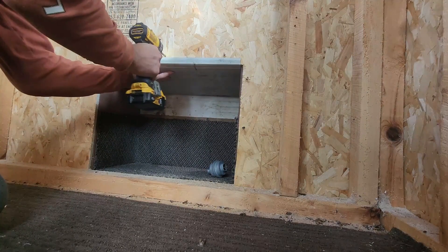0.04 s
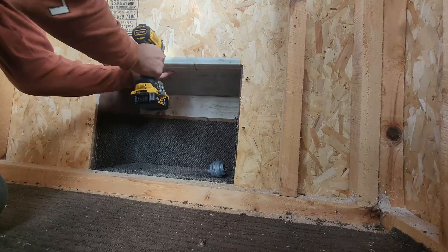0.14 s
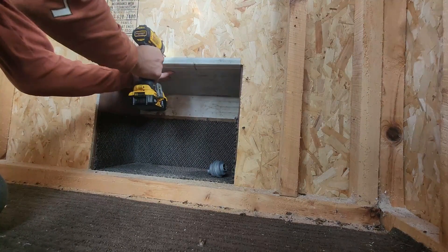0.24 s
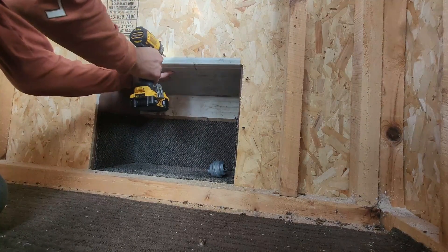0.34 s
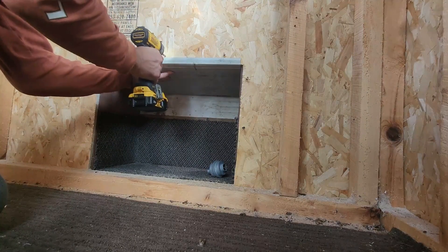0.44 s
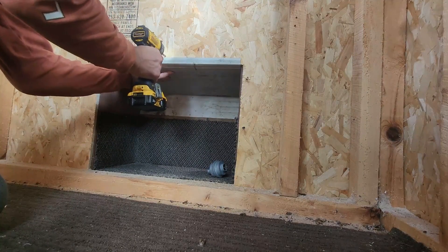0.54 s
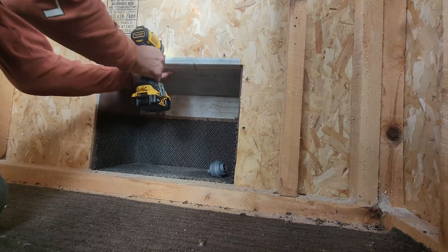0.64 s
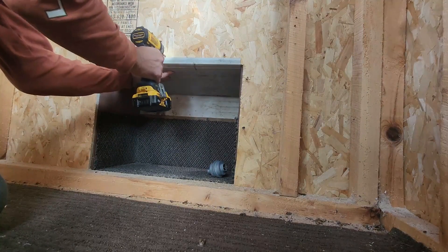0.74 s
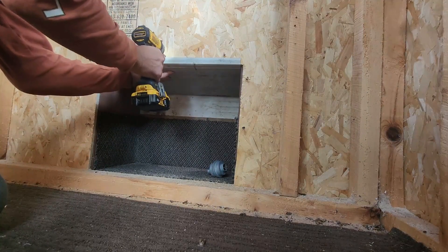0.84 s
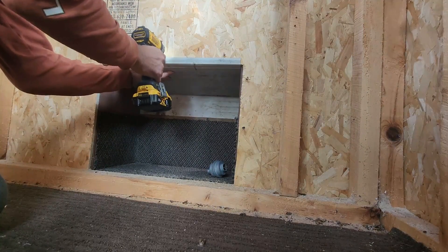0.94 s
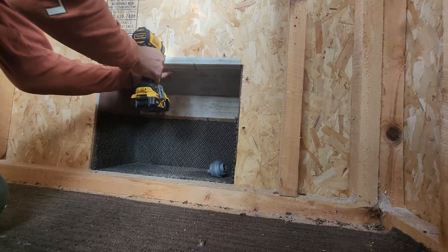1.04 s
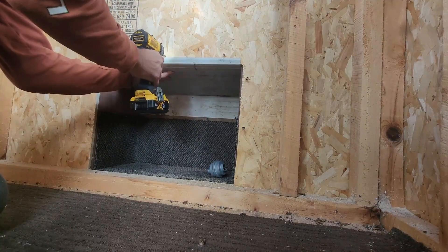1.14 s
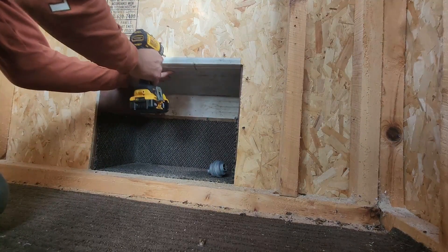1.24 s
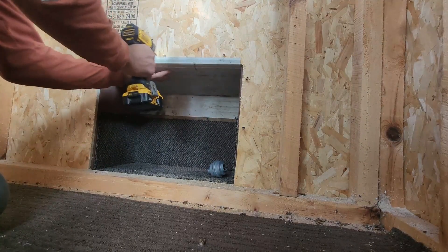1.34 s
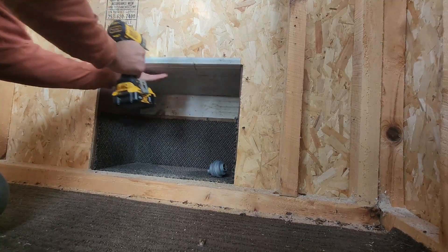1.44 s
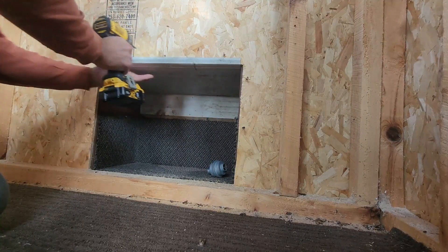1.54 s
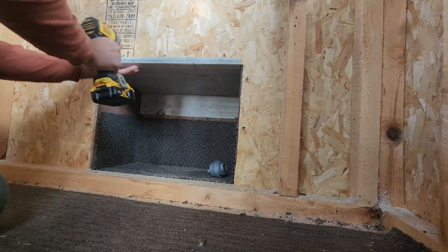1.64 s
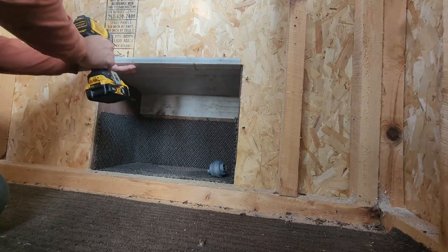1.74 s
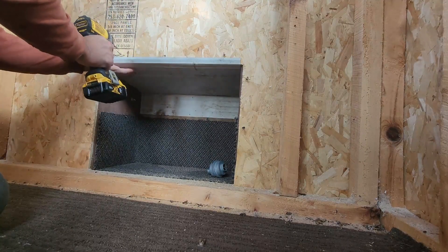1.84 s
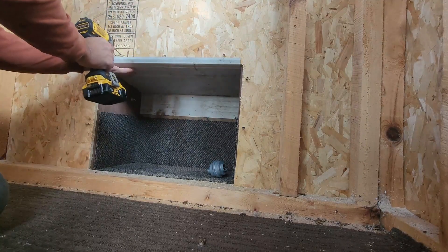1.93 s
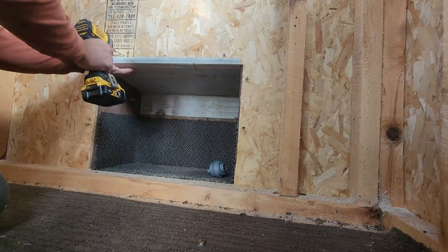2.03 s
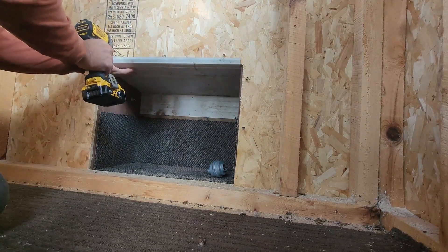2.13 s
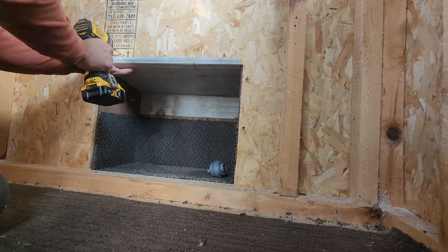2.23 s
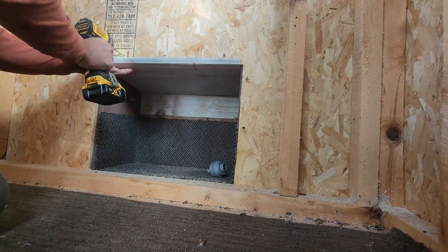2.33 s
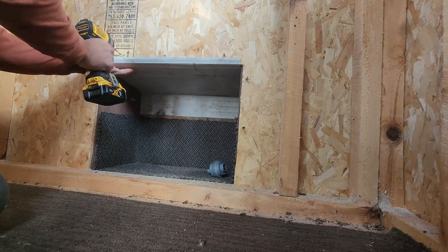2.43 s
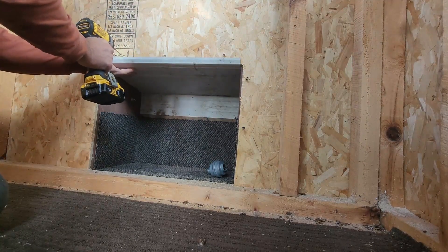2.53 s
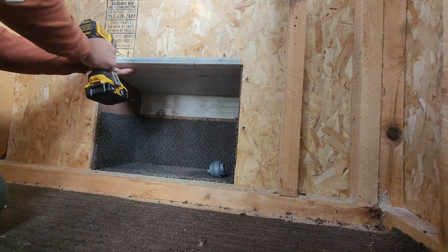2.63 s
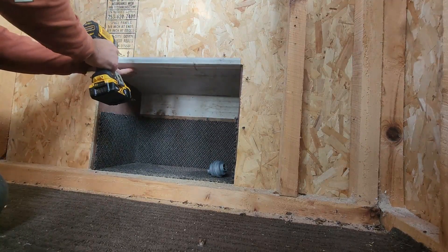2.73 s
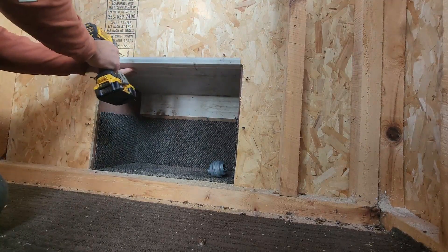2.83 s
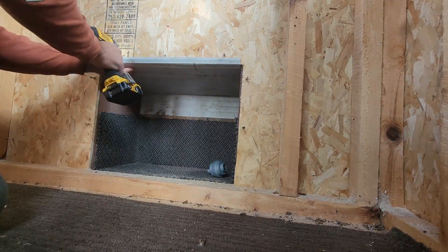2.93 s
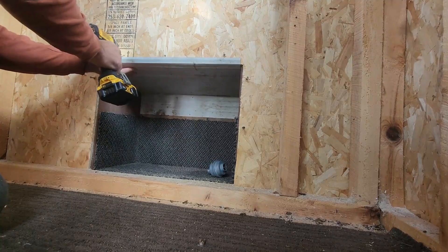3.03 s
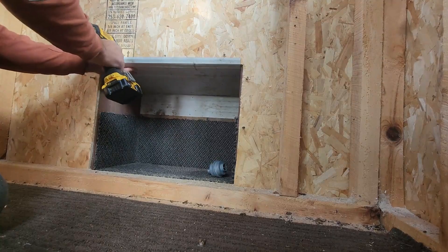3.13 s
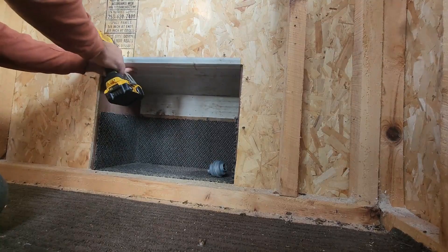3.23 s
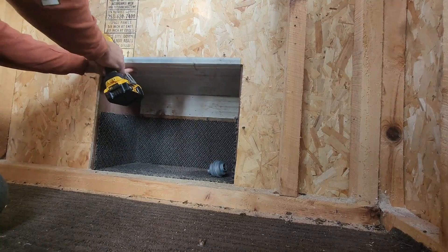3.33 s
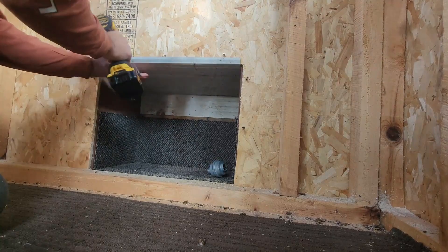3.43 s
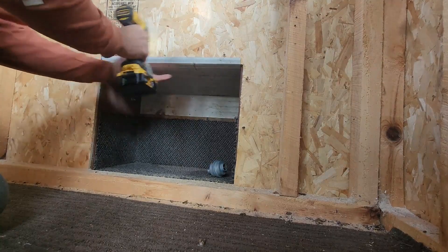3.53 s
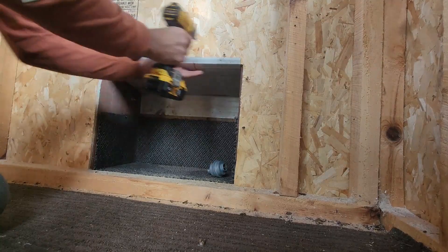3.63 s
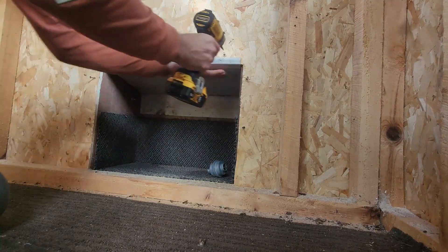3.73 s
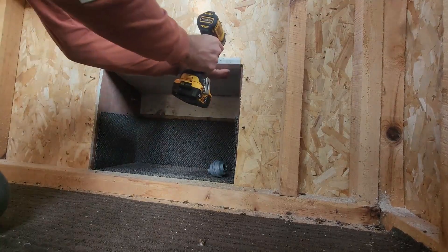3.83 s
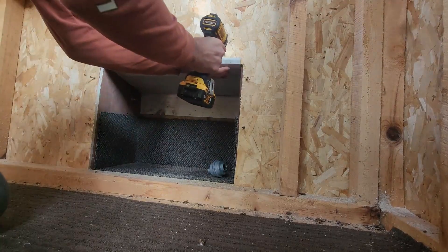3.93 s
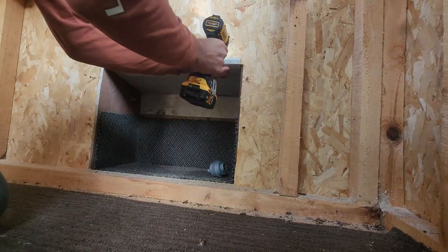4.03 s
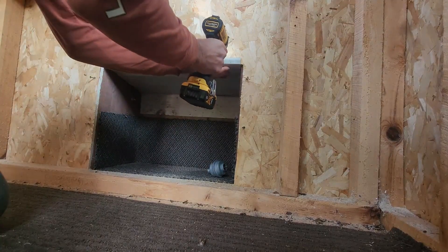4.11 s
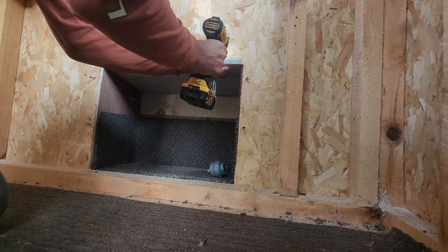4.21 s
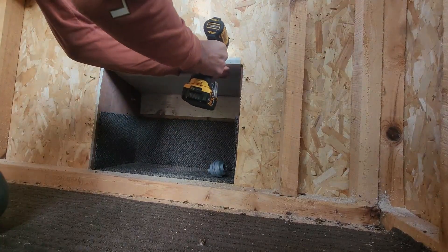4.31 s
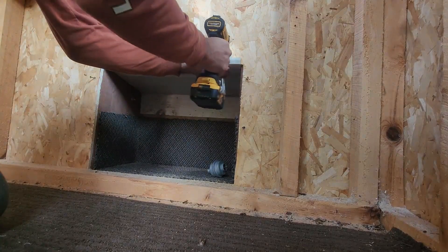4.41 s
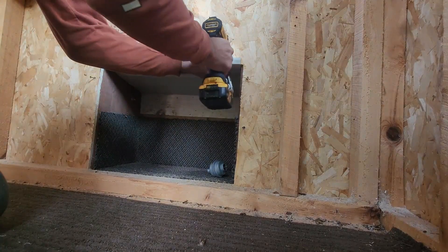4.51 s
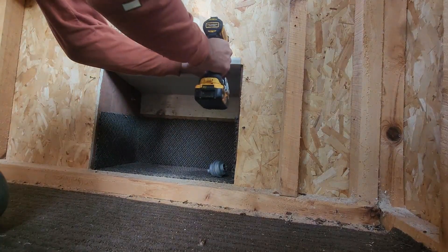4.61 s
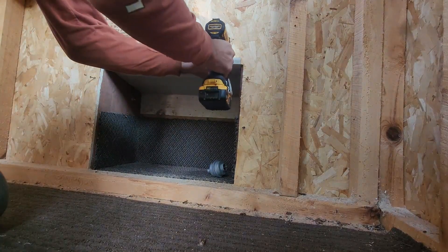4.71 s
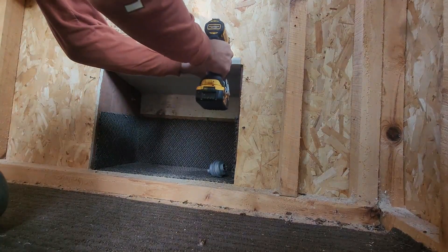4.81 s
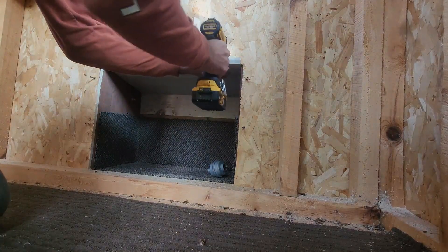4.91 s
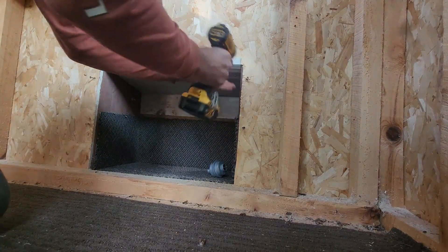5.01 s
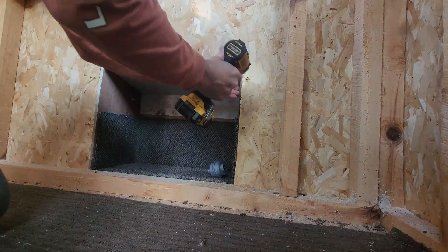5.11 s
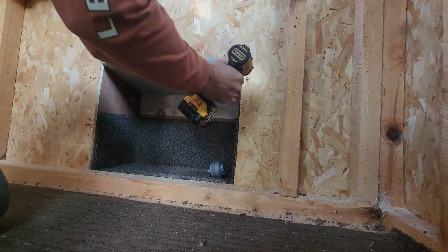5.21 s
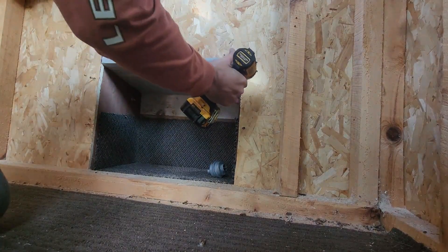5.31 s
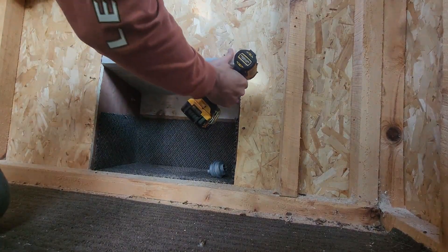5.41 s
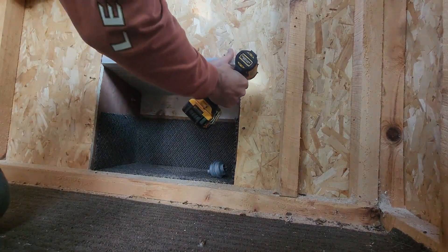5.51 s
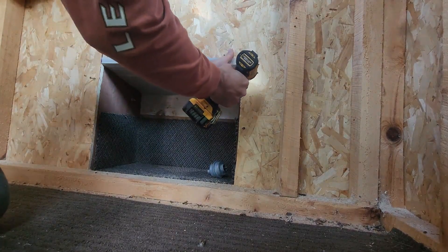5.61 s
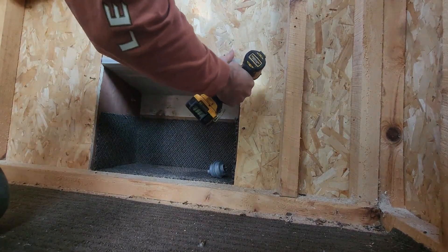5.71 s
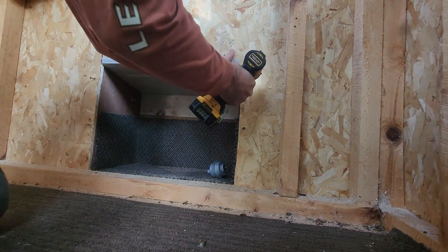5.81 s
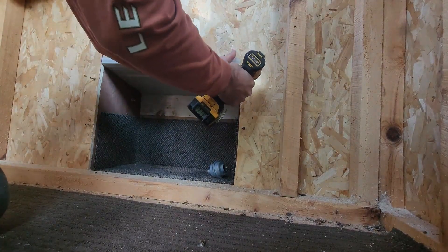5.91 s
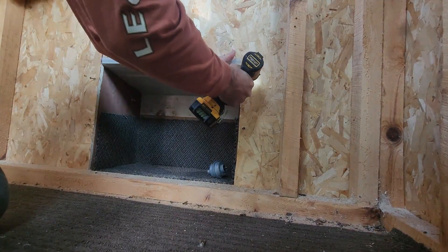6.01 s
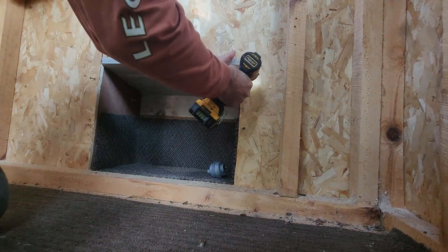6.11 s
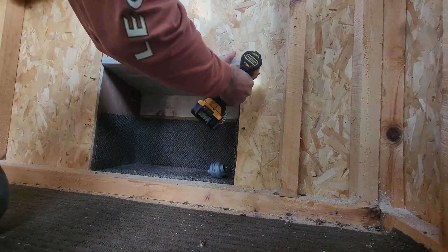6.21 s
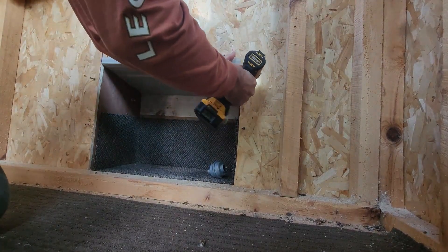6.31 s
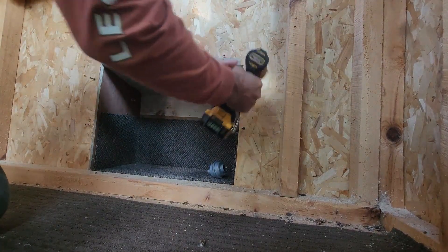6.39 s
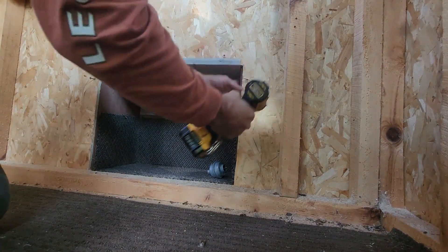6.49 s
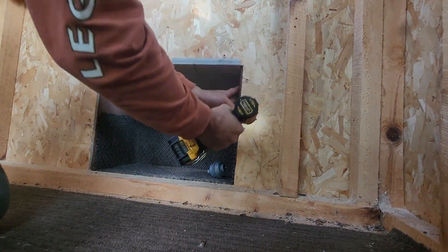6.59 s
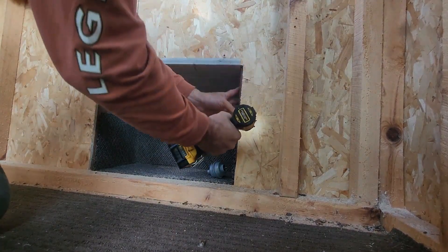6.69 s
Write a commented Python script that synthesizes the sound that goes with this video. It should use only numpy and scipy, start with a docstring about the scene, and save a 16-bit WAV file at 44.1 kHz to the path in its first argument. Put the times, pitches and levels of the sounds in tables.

```python
"""A cordless impact driver runs screws through a metal frame into the wall of a small wooden hut.
Four loud pulls come first: motor tones whine up and down with rotor speed, gears and bit rattle as
chattering noise, the hammer strikes as noise bursts and the board wall booms in its modes.
Knocks of the bit and soft low rubbing come in the pauses before ten weaker pulls in groups of four, three
and three, each group with its own echoes; floor rumble and faint air noise run throughout."""
import sys
import numpy as np
from scipy import signal
from scipy.fft import rfft, irfft
from scipy.io import wavfile
from scipy.ndimage import uniform_filter1d

SR = 44100
rng = np.random.default_rng(int(sys.argv[2]) if len(sys.argv) > 2 else 0)


def wrap_up_sound(samples):
    """Save the sound to the file named by the first command line argument, as 16-bit audio."""
    columns = np.atleast_2d(samples).T
    # keep every value between -1 and 1, then stretch to whole-number steps
    tamed = np.clip(columns, -1, 1)
    steps = np.round(tamed * 32767).astype(np.int16)
    wavfile.write(sys.argv[1], SR, steps)


N = 297675  # 6.75 s
T = np.arange(N) / SR


def amp(db):
    """Decibels to gain."""
    return 10 ** (np.asarray(db) / 20)


def unit(x):
    """Scales to rms 1."""
    return x / np.sqrt(np.mean(x ** 2) + 1e-20)


def read(points, hz):
    """Reads a (Hz, value) table on a log-frequency axis."""
    point_hz, value = np.transpose(points)
    return np.interp(np.log(hz + 1), np.log(point_hz + 1), value)


def colour(x, points):
    """Minimum-phase filter of the given spectrum: clicks keep their sharp front."""
    hz = abs(np.fft.fftfreq(4096, 1 / SR))
    log_gain = np.log(amp(np.maximum(read(points, hz), -90)))
    taps = np.fft.ifft(np.exp(np.conj(signal.hilbert(log_gain)))).real[:2048]
    return signal.oaconvolve(x, taps / np.linalg.norm(taps))[:len(x)]


def wander(max_hz):
    """Low-passed noise of rms 1."""
    spectrum = rfft(rng.standard_normal(N)) * (np.fft.rfftfreq(N, 1 / SR) < max_hz)
    return unit(irfft(spectrum, N))


def patchy(x, db):
    """Shifting contacts favour a few hundred hertz here and there, for some hundredths of a second."""
    z = signal.stft(x, nperseg=512, noverlap=384)[2]
    field = uniform_filter1d(rng.standard_normal(z.shape), size=4, axis=0)
    field = uniform_filter1d(field, size=8, axis=1)
    return unit(signal.istft(z * amp(db * unit(field)), nperseg=512, noverlap=384)[1][:N])


def strikes(times_s, levels_db, decay_s, rise_s):
    """Bursts of contact noise: exponential rise before the peak, exponential decay after."""
    lead = 2000  # samples before the peak
    out, t = np.zeros(N + 8000), np.arange(-lead, 4000) / SR
    shape = np.exp(np.minimum(t / rise_s, -t / decay_s))
    for time_s, level_db in zip(times_s, levels_db):
        burst = amp(level_db) * shape * rng.standard_normal(len(t))
        out[int(time_s * SR) - lead:][:len(t)] += burst
    return out[:N]


def swell(start_s, length_s, rise_s, fade_db_per_s):
    """Linear rise, hold to the end of the length, then a fade at a constant dB rate."""
    rise = np.clip((T - start_s) / rise_s, 0, 1)
    return rise * amp(-fade_db_per_s * np.maximum(T - start_s - length_s, 0))


def pan(left_db):
    """Gains of the two channels, left against right."""
    return amp(np.array([[left_db / 2], [-left_db / 2]]))


# Trigger pulls. Each row: start in seconds, time to bite in seconds, run-up in seconds, trigger held in
# seconds, time under load in seconds, nominal top speed in rev/s, whine against rattle in dB, gear rattle in
# dB, bit scrape in dB, wall shaking in dB, sag after the bite in dB/s (negative: growth), run-up ease
# exponent (1 brisk, 3 hesitant). Layer levels are relative.
PULLS = [(.05, 0.043, .102, .103, .14, 325.9, 2, -21, -20.5, -25, 24, 1.6),
         (.333, 0.045, .055, .085, .13, 395, -14, -21, -21.5, -13.5, 81.5, 1.5),
         (.586, 0.04, .064, .08, .11, 370, -19, -24, -24.5, -14, 44.5, 1.5),
         (.862, 0.029, .068, .13, .16, 400.2, -22, -23, -25, -16.5, 42.5, 1.5),
         (2.592, 0.031, .096, .133, .16, 398, 2, -34.5, -34, -34.5, -1.5, 1.3),
         (2.842, 0.046, .072, .074, 0.096, 324.7, 3, -32.5, -35.5, -38.5, -3, 3),
         (3.05, 0.039, .04, .045, 0.046, 279.9, -12.5, -31.5, -36, -26, 113, 1.5),
         (3.197, 0.045, .04, .055, 0.055, 300, -17.5, -31.5, -30.5, -25.5, 158.5, 1.5),
         (4.465, 0.03, .062, .068, 0.074, 274.1, -5, -32.5, -32.5, -30, 202, 1.5),
         (4.645, 0.028, .08, .08, 0.08, 320.2, -4, -35, -35, -42, -1, 1.5),
         (4.836, 0.04, .047, .08, 0.093, 280, -15.5, -29, -30.5, -25.5, 132.5, 1.5),
         (5.786, 0.027, .064, .066, 0.074, 274.8, -7.5, -35, -36.5, -34.5, 176, 1.5),
         (5.958, .041, .09, .113, .13, 401, 6.5, -37.5, -34, -36.5, -52.5, 1.2),
         (6.307, 0.047, .066, .08, 0.091, 399.3, -20.5, -30, -28, -36.5, 124, 1.5)]
GEAR_COLUMN, SCRAPE_COLUMN, SHAKE_COLUMN = 7, 8, 9
BRAKE_S, BRAKE_SHARE, COAST_S = .028, .45, .2  # braked share of the speed; time constant of the coasting


def rotor():
    """Rotor speed in rev/s and whine share: eases up, holds, is braked on release and coasts."""
    speed, whine = np.zeros(N), np.zeros(N)
    for start, _, run_up, held, _, revs, whine_db, *_, ease in PULLS:
        on = slice(int(start * SR), int(start * SR) + SR // 2)
        t = T[on] - start
        rise = np.sin(np.pi / 2 * np.clip(t / run_up, 0, 1)) ** ease
        braked = 1 - 1 / (1 + (np.maximum(t - held, 0) / BRAKE_S) ** 3)
        coast = np.exp(-np.maximum(t - held - BRAKE_S, 0) / COAST_S)
        fall = (1 - BRAKE_SHARE * braked) * coast
        speed[on] = revs * rise * fall
        whine[on] = amp(whine_db) * np.sqrt(rise) * fall ** 2
    return speed, whine


START_S = 0.019  # linear fade-in of each pull


def effort(shape, column):
    """Gain of one layer over all pulls: climbs until the bit bites, sags as the screw turns in, fades."""
    rise_db, bend, delay, sag_share, fade = shape
    gain = np.zeros(N)
    for row in PULLS:
        start, bite, _, _, loaded, *_, sag, _ = row
        span = slice(int(start * SR), int(start * SR) + SR // 2)
        t = T[span] - start - delay
        climb_db = rise_db * np.maximum(1 - t / bite, 0) ** bend
        sag_db = sag_share * sag * np.maximum(np.minimum(t, loaded) - bite, 0)
        fade_db = fade * np.maximum(t - loaded, 0)
        fade_in = np.clip((T[span] - start) / START_S, 0, 1)
        gain[span] += amp(row[column] - climb_db - sag_db - fade_db) * fade_in
    return gain


# Motor tones, six magnetic pulls a turn. Each row: multiple of rotor speed, level in dB.
ORDERS = [(4, -8), (6, 2), (8, -7), (10, -12), (12, 1.5), (18, -9)]
# Radiation of the tool housing. Each row: frequency in Hz, gain in dB.
HOUSING = [(400, -26), (900, -12), (1250, -1.5), (1550, -0.5), (2000, -2.5), (2450, -5.5), (3000, -7),
           (3900, -1), (4700, 2.5), (5800, -10), (7200, -1), (10000, -4)]
# Gear rattle spectrum. Each row: frequency in Hz, density in dB per Hz.
GEARS = [(150, -21.5), (440, -9), (790, -5.5), (1200, -2.5), (1550, -3), (2400, -3.5), (3000, -4),
         (3600, -4), (4400, -9), (5500, -14.5), (7500, -32), (11000, -67.5)]
# Steel spectrum of bit scrape and knock ticks. Each row: frequency in Hz, density in dB per Hz.
STEEL = [(2650, -27), (4500, 1), (5250, -9.5), (5710, -7.5), (7490, -4.5), (8830, -7), (9820, -10.5),
         (11600, 0), (14500, 0.5), (15300, -5), (16000, -9.5)]
# Layer envelopes. Each: rise up to the bite in dB, bend of the rise (over 1 early, under 1 late), delay in
# seconds, share of the sag, fade after load in dB/s.
GEAR_SHAPE = (25, 1.7, 0.0054, 1.2, 575)
WHINE_SHAPE = (31, 1.3, .003, 0.46, 380)
SCRAPE_SHAPE = (29, 0.85, .002, 0.66, 800)


def rattle(contacts_per_s, once_a_turn, jolts, chatter=0.77, grain_db=3.5, patch_db=3.2):
    """Many tiny contacts of random size and sign, weighted more heavily once a turn."""
    sizes = amp(grain_db * np.minimum(rng.exponential(1, N), 4)) * rng.choice([-1., 1.], N)
    contacts = sizes * (rng.random(N) < contacts_per_s / SR)
    return patchy(contacts * (1 + chatter * once_a_turn) * jolts, patch_db)


def driver(jolt_db=0.17, grab_db=0.93, waver=.009, flutter=.4, throb=.3):
    """Motor tones at multiples of rotor speed over gear teeth and a bit that chatter once a turn."""
    speed, share = rotor()
    turns = np.cumsum(speed * (1 + waver * wander(300))) / SR
    once_a_turn = np.cos(2 * np.pi * turns)
    jolts = amp(jolt_db * wander(140))
    balance = np.sqrt(1 + share ** 2)  # splits power between whine and gears

    tones = np.zeros(N, complex)
    for k, db in ORDERS:
        level = amp(db + read(HOUSING, k * speed)) * (1 + flutter * wander(170))
        tones += level * np.exp(2j * np.pi * k * turns)
    direct = share * tones * (1 + throb * once_a_turn) / balance
    # the whine reaches the two microphones a quarter cycle apart
    whine = np.array([direct.real, direct.imag])
    whine = whine + amp(-4) * hut(direct.real, wet_db=-1, ring_db=-24)

    teeth = colour(rattle(7000, once_a_turn, jolts), GEARS) / balance
    gears = hut(amp(-1.0) * teeth, wet_db=-1.0, ring_db=-14.5)
    bit = colour(rattle(6000, once_a_turn, jolts), STEEL)
    scrape = hut(amp(1.5) * bit, wet_db=2, ring_db=-30.5)

    sound = effort(GEAR_SHAPE, GEAR_COLUMN) * gears
    sound = sound + effort(WHINE_SHAPE, GEAR_COLUMN) * whine
    sound = sound + effort(SCRAPE_SHAPE, SCRAPE_COLUMN) * scrape
    # the bit grabs and lets go in the screw head
    return sound * amp(grab_db * wander(140))


# Hammer blows and slips of the bit. Each row: time in seconds, crack in dB, clunk of the stud in dB, push on
# the wall in dB, all relative.
BLOWS = [(.065, -27, -32, -23.5), (.377, -4, -16.5, -4), (.387, -2, -20, -12), (0.4075, -6, -21.5, -25),
         (.429, -15, -14, -11.5), (0.5896, -23, -38, -34.5), (0.6211, -27, -28.5, -8),
         (0.6319, -3.5, -20.5, -9.5), (.652, -6, -27.5, -31), (.6768, -10, -17, -13),
         (.697, -19, -21.5, -17.5), (.878, -33, -22, -11.5), (0.8923, -9.5, -15, -9),
         (0.9197, -4.5, -20, -23), (0.9401, -4.5, -18.5, -14), (0.9614, -3, -19, -9),
         (0.9818, -27, -17.5, -11), (1.0137, -17, -21.5, -23.5), (3.0855, -31, -23, -15),
         (3.0931, -12.5, -25, -34), (3.2284, -20, -19, -18.5), (3.234, -12, -24, -23),
         (4.4931, -15, -33.5, -43.5), (4.5025, -16.5, -29, -20), (4.8678, -16, -29, -22.5),
         (4.8778, -14.5, -31.5, -24), (4.932, -28.5, -37, -28.5), (5.811, -28, -24.5, -20),
         (6.0957, -11, -29.5, -29), (6.106, -27.5, -27, -27), (6.337, -10, -26.5, -31),
         (6.3901, -22.5, -37, -42)]
# Crack spectrum. Each row: frequency in Hz, density in dB per Hz.
CRACK = [(250, -21), (450, -5), (800, -3), (2000, 0), (5000, -5), (9500, -9), (12500, -0.5), (16000, -7)]


def hammer():
    """Steel blows pass down the bit into screw and frame: millisecond noise bursts."""
    times, crack_db, _, _ = np.transpose(BLOWS)
    cracks = colour(strikes(times, crack_db, decay_s=0.0015, rise_s=0.00013), CRACK)
    return amp(-2.5) * hut(cracks, wet_db=-1.5, ring_db=-12.0)


# Modes of the metal frame and the boards round it. Each row: frequency in Hz, level in dB, t60 in seconds.
FRAME = [(339, -6, .26), (421, 1, .19), (468, -2, .22), (574, 2, .18), (628, -1, .2), (795, -1, .16),
         (974, -1, .15), (1203, 0, .13), (1428, 0, .13), (1556, 1, .13), (1896, -1, .1), (2252, 0, .09),
         (2395, -1, .07)]


def frame_ring():
    """Impulse response of the frame modes from one spot: random phases, exponential decays."""
    t = T[:SR // 3]
    ring = np.zeros(len(t))
    for hz, db, t60 in FRAME:
        ring += amp(db - 60 * t / t60) * np.sin(2 * np.pi * (hz * t + rng.random()))
    return unit(ring)


# Grinding envelope: columns as the layer envelopes above; a negative share turns sag into growth.
GRIND_SHAPE = (30.5, 0.8, 0, -0.33, 699.5)
# Push of the thread on the frame. Each row: frequency in Hz, density in dB per Hz.
GRIND = [(300, 0), (600, -1.5), (1200, -1), (2400, -4), (4000, -9.5)]


def frame(grind_db=-27):
    """The thread grinding under load sets the frame ringing; the low modes outlast the pull."""
    grind = effort(GRIND_SHAPE, SHAKE_COLUMN) * colour(rng.standard_normal(N), GRIND)
    rings = np.array([frame_ring(), frame_ring()])
    rings = rings / np.linalg.norm(rings[0])
    return signal.oaconvolve(amp(grind_db) * grind[None], rings, axes=1)[:, :N]


# Bit and tool against screw and frame. Each row: nominal time in seconds, knock in dB, bright tick in dB,
# clunk of the stud in dB, push on the wall in dB, all relative.
KNOCKS = [(1.22, -59, -70.5, -55, -39), (1.315, -50, -65, -52.5, -36.5), (1.458, -58, -62.5, -55, -38),
          (1.939, -53, -85, -58, -61.5), (1.991, -55.5, -86.5, -54, -52), (2.25, -56.5, -78, -69.5, -71.5),
          (2.359, -39.5, -56, -50.5, -55), (2.372, -42.5, -50.5, -49, -49), (2.495, -45, -59, -40, -26),
          (2.958, -46, -71, -40, -29), (3.369, -46.5, -50.5, -46.5, -49.5), (3.469, -48, -54, -61.5, -68.5),
          (4.175, -47.5, -72, -62.5, -66), (4.261, -51, -86, -60, -59.5), (4.278, -61.5, -90.5, -47.5, -40),
          (4.764, -56.5, -73.5, -47, -37), (5.577, -51.5, -56.5, -71.5, -75.5), (5.601, -49, -67, -54, -66),
          (5.667, -58.5, -70.5, -55, -48.5), (6.279, -65, -83.5, -66, -63)]
# Dull knock spectrum. Each row: frequency in Hz, density in dB per Hz.
KNOCK = [(200, 12.5), (500, -6), (1300, -0.5), (2400, -0.5), (3000, 0), (4200, -3), (5500, -15),
         (10000, -24), (16000, -41)]


def knocks(rise_s=.0045, grit_db=6):
    """The bit skips onto the screw head: a dull, gritty noise burst and a small bright tick."""
    times, knock_db, tick_db, _, _ = np.transpose(KNOCKS)
    dull = colour(strikes(times + .002, knock_db, decay_s=0.0042, rise_s=rise_s), KNOCK)
    bright = colour(strikes(times + 0.0033, tick_db, decay_s=0.0012, rise_s=rise_s), STEEL)
    grit = amp(grit_db * np.clip(wander(300), -2, 1))
    return hut((amp(1.5) * dull + amp(5) * bright) * grit, wet_db=0, ring_db=-16)


# Woody clunk of the stud behind the screw. Each row: frequency in Hz, density in dB per Hz.
STUD = [(150, -19), (240, -2.5), (290, 1), (350, -6.5), (420, 0.5), (560, -8), (800, -11), (1500, -29),
        (4000, -72)]


def stud(knock_db=0.5, knock_delay_s=0.00385):
    """Each blow and each knock clunks the timber behind the screw: short, low noise bursts."""
    hits = [(row[0], row[2]) for row in BLOWS]
    hits += [(row[0] + knock_delay_s, row[3] + knock_db) for row in KNOCKS]
    times, db = np.transpose(hits)
    clunk = colour(strikes(times, db, decay_s=0.0061, rise_s=0.00056), STUD)
    # half of its power reaches both microphones directly
    return (clunk + hut(clunk, wet_db=2.0, ring_db=-23)) / np.sqrt(2)


# Modes of the board wall. Each row: frequency in Hz, level in dB, t60 in seconds (nominal, before onset).
WALL = [(98.32, -12, .75), (143, -14, 0.18), (193.7, 7.5, 0.099), (189.5, -4.5, 0.26), (212.1, -11.5, .34),
        (234.8, -5, 0.27), (245, -14.5, .14)]
# Radiation of the shaken boards. Each row: frequency in Hz, density in dB per Hz.
BOARDS = [(45, -29), (80, -19), (99, -7), (120, -10.5), (160, -20), (186, 4.5), (215, -2), (255, -3),
          (305, -27), (470, -21.5), (680, -36), (1000, -48), (3000, -81)]
# Shaking envelope: columns as the layer envelopes above.
SHAKE_SHAPE = (30, 0.44, .002, 1.0, 256)
# Boards settling after a pull: level at no shaking in dB, share of the shaking level, fade in dB/s.
BOARD_SETTLE = (-30.5, .8, 180)


def wall(blow_db=-7, knock_db=-6, thud_db=-5, shake_db=-7, drone_db=-5, hum_db=-4):
    """Hits thud and ring the board modes; the running tool makes them tremble and a low hum lingers."""
    t = T[:SR * 2 // 3]
    ring = sum(amp(db - 60 * t / t60) * np.sin(2 * np.pi * hz * t) for hz, db, t60 in WALL)
    ring = ring * (1 - np.exp(-t / 0.0042))  # the sheet takes a cycle to swing up

    hits = [(row[0], row[-1] + blow_db) for row in BLOWS]
    hits += [(row[0], row[-1] + knock_db) for row in KNOCKS]
    times, db = np.transpose(hits)
    push = np.zeros(N)
    push[(times * SR).astype(int)] = amp(db)
    boom = signal.oaconvolve(push, ring)[:N]

    # the pressing hand damps the modes while it shakes them
    tremble = signal.oaconvolve(rng.standard_normal(N), ring * np.exp(-t / 0.04))[:N]
    tremble /= np.sqrt(abs(uniform_filter1d(tremble ** 2, size=1500)) + 1e-9)  # levelled
    shaking = effort(SHAKE_SHAPE, SHAKE_COLUMN)
    # the tails and the soft rubbing hold only the low modes
    low_modes = signal.butter(4, [110, 270], "band", fs=SR, output="sos")
    hum = unit(signal.sosfilt(low_modes, tremble))
    drone = amp(drone_db) * shaking * tremble
    drone = drone + amp(hum_db) * stirring(BOARD_SETTLE, STIR_BOARD_COLUMN) * hum

    def shaken_boards():
        """Broad noise of shaking and thuds."""
        shake = amp(shake_db) * shaking * rng.standard_normal(N)
        thuds = amp(thud_db) * strikes(times, db, decay_s=0.011, rise_s=0.0014)
        return colour(shake + thuds, BOARDS)

    shared, left, right = (shaken_boards() for _ in range(3))
    # the long waves reach both microphones alike, the shorter ones do not
    apart = signal.lfilter(*signal.butter(2, 270, "high", fs=SR), np.array([left, right]))
    return (boom + drone + shared + amp(4.5) * apart) * pan(-2.2)


# Low stirring of boards and floor: ringing tails of loud pulls, and rubbing in the pauses. Each row: start
# in seconds, length in seconds, boards in dB, floor rumble in dB, all levels relative.
STIRS = [(-.02, 0.013, -29.5, -28.5), (0.137, 0.098, -25.5, -30), (0.461, 0.04, -19, -42),
         (0.714, 0.025, -23, -38.5), (1.427, .12, -39, -50.5), (1.596, 0.18, -54.5, -56),
         (2.503, 0.045, -48.5, -51.5), (2.79, 0.22, -62.5, -52), (3.327, 0.085, -54.5, -49.5),
         (6.159, 0.06, -58, -52.5), (6.456, 0.065, -56, -55)]
STIR_BOARD_COLUMN, STIR_FLOOR_COLUMN = 2, 3
STIR_RISE_S, STIR_FADE_DB_PER_S = 0.0081, 196.5


def stirring(settle, column):
    """Gain of the low stirring of boards or floor: the strongest of the settling pulls and the table rows."""
    base_db, share, fade = settle
    gains = []
    for row in PULLS:
        start, bite, _, _, loaded, *_ = row
        level = amp(base_db + share * row[SHAKE_COLUMN])
        gains.append(level * swell(start, loaded, bite, fade))
    for row in STIRS:
        gains.append(amp(row[column]) * swell(row[0], row[1], STIR_RISE_S, STIR_FADE_DB_PER_S))
    return np.max(gains, axis=0)


# Sway of the sheet under the push of the arm. Each row: start in seconds, length in seconds, level in dB.
SWAYS = [(0.168, 0.039, -28.5), (0.44, 0.074, -26.5), (1.018, 0.069, -26.5), (4.867, 0.061, -35),
         (5.179, 0.024, -52.5), (2.646, 0.16, -45), (6.039, 0.09, -34.5), (6.313, 0.058, -42)]
SWAY_BAND_HZ = (92.7, 111.3)


def sway(rise_s=0.017, fade_db_per_s=170):
    """Deep flutter of the whole sheet in its lowest mode: narrow-band noise while the arm leans on it."""
    band = signal.butter(2, SWAY_BAND_HZ, "band", fs=SR, output="sos")
    flutter = unit(signal.sosfilt(band, rng.standard_normal(N)))
    gain = sum(amp(db) * swell(start, length, rise_s, fade_db_per_s) for start, length, db in SWAYS)
    return gain * flutter * pan(-2)


# Floor rumble spectrum. Each row: frequency in Hz, density in dB per Hz.
RUMBLE = [(12, -10), (40, -1.5), (75, -4), (115, -4.5), (170, -20), (300, -30), (6000, -61)]
# Floor settling after a pull: level at no shaking in dB, share of the shaking level, fade in dB/s.
FLOOR_SETTLE = (-21, 1, 61.5)
# Air noise spectrum. Each row: frequency in Hz, density in dB per Hz.
AIR = [(100, -4), (600, -11.5), (1800, -26), (16000, -33.5)]
FLOOR_DB, AIR_DB = -74.5, -85  # floor at rest, air


def background():
    """Low noise rumble of the floor, raised by the stirring, and very quiet air noise."""
    shared, left, right = (colour(rng.standard_normal(N), RUMBLE) for _ in range(3))
    level = amp(FLOOR_DB) + stirring(FLOOR_SETTLE, STIR_FLOOR_COLUMN)
    rumble = level * (shared + 0.49 * np.array([left, right]))
    air = np.array([colour(rng.standard_normal(N), AIR) for _ in range(2)])
    return rumble * pan(-.4) + amp(AIR_DB) * air


# Decay of the hut. Each row: frequency in Hz, t60 in seconds.
HUT = [(200, 0.071), (700, 0.11), (2000, 0.082), (5000, 0.082), (15000, 0.092)]
COLOUR_OCTAVES = 0.15  # width of a screw's pitch colour


def echoes(wet_db, ring_db, colours):
    """Echo cluster off the close boards, a short tail and the frame's ring, in the colour of one screw."""
    size = SR // 3
    taps, near = np.zeros(size), np.zeros(size)
    # one echo of random sign in every 12 samples
    at = np.arange(120, size - 12, 12)
    taps[at + rng.integers(0, 12, len(at))] = rng.choice([-1., 1.], len(at))
    hz, t, z = signal.stft(taps, SR, nperseg=256)
    tail = signal.istft(z * amp(-60 * t / read(HUT, hz)[:, None]), SR)[1][:size]
    near_at = np.arange(0, 240, 12) + rng.integers(0, 12, 20)
    near[near_at] = rng.choice([-1., 1.], 20) * np.geomspace(1, .25, 20)
    response = unit(near) + amp(wet_db) * unit(tail)
    # the echoes ripple the spectrum only finely; the broad shape belongs to the screw
    spectrum, hz = np.fft.fft(response), abs(np.fft.fftfreq(size, 1 / SR))
    broad = np.sqrt(uniform_filter1d(abs(spectrum) ** 2, size=130, mode="wrap"))
    shape_db = np.zeros(size)
    for centre, db in colours:
        shape_db += db * np.exp(-(np.log2((hz + 1) / centre) / COLOUR_OCTAVES) ** 2)
    causal = np.exp(np.conj(signal.hilbert(np.log(amp(shape_db) / broad))))
    coloured = unit(np.fft.ifft(spectrum * causal).real)
    return (coloured + amp(ring_db) * frame_ring()) / np.sqrt(size)


# Times in seconds at which the tool moves on to another screw, and so to other echoes.
MOVES = [1.85, 4.0, 5.4]
# Pitches favoured or swallowed by the part of the frame a screw bears on. Each row, one a screw: pairs of
# frequency in Hz, gain in dB.
SCREW_COLOURS = [
    [(1550, 1.5), (2380, 2), (2850, -3)],
    [(430, -0.5), (650, -13.5), (1400, 3)],
    [(680, -2), (820, 3.5), (1520, 2.5)],
    [(420, -0.5), (810, -2), (1300, -0.5)],
]


def hut(x, wet_db, ring_db):
    """Convolves with echoes that differ at each microphone and for each screw."""
    out = np.zeros((2, N + SR))
    edges = [0] + [int(s * SR) for s in MOVES] + [N]
    for a, b, colours in zip(edges, edges[1:], SCREW_COLOURS):
        for ear in range(2):
            heard = signal.fftconvolve(x[a:b], echoes(wet_db, ring_db, colours))
            out[ear, a:a + len(heard)] += heard
    return out[:, :N]


def scene():
    """Everything heard inside the hut."""
    return driver() + frame() + hammer() + stud() + knocks() + wall() + sway() + background()


# Shading of the left microphone. Each row: frequency in Hz, gain against the right in dB.
SHADE = [(300, -1), (500, -1.5), (2000, 0.5), (4500, -1.5), (7000, 2.5), (16000, -11)]
EDGE_HZ = 16150


def record(dry):
    """The shaded left microphone, the full-scale limit and the band edge."""
    shade = amp(read(SHADE, np.fft.rfftfreq(N, 1 / SR)))
    heard = np.array([irfft(rfft(dry[0]) * shade, N), dry[1]])
    edge = signal.firwin(401, EDGE_HZ, window=("kaiser", 9), fs=SR)
    return signal.oaconvolve(np.clip(heard, -1, 1), edge[None], "same")


dry = scene()
out = record(dry)
wrap_up_sound(out)
```